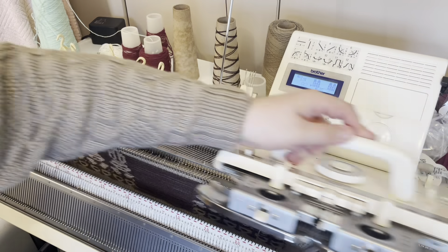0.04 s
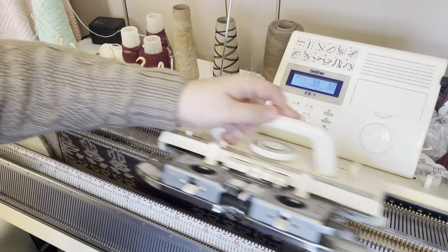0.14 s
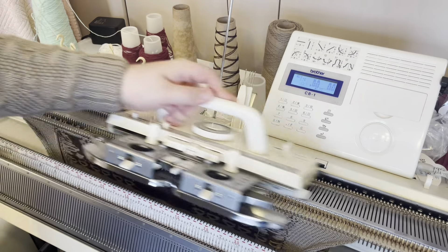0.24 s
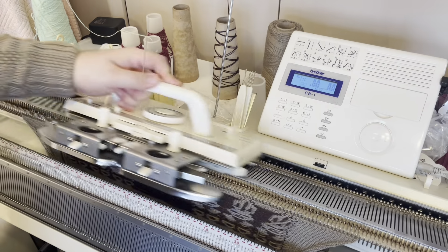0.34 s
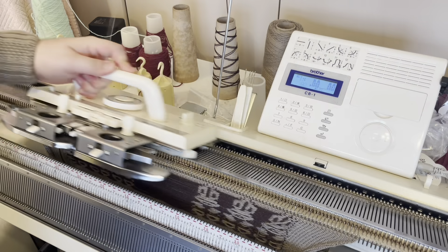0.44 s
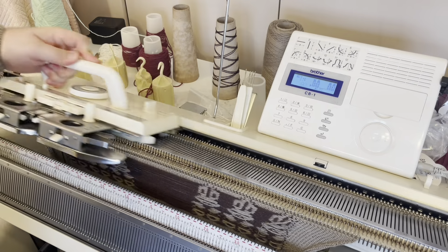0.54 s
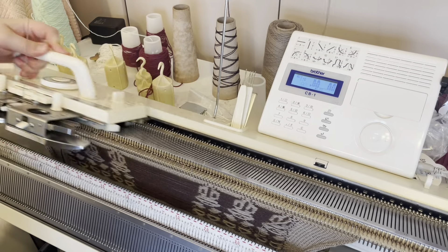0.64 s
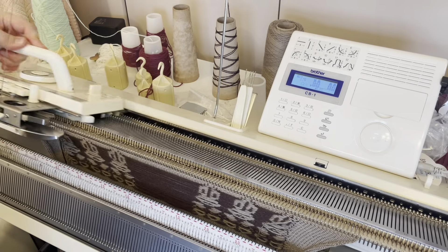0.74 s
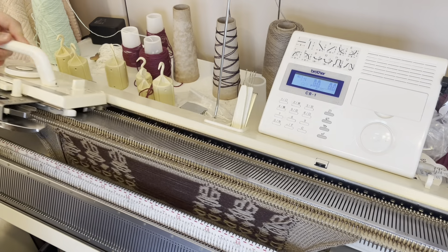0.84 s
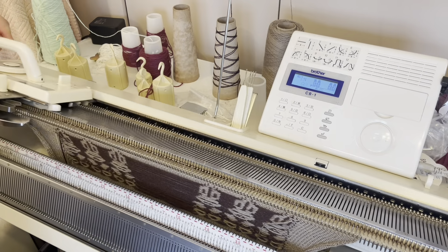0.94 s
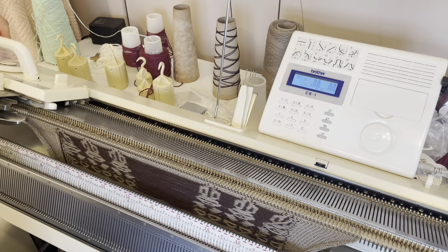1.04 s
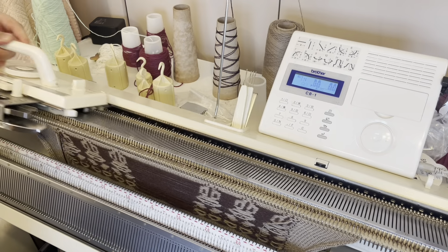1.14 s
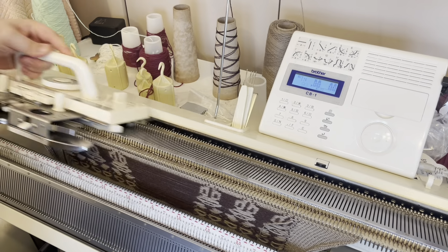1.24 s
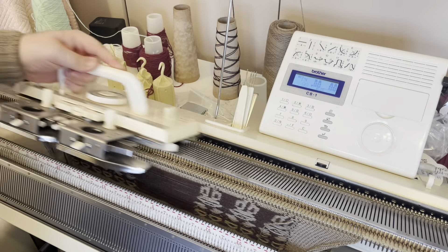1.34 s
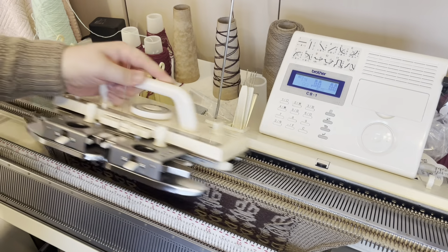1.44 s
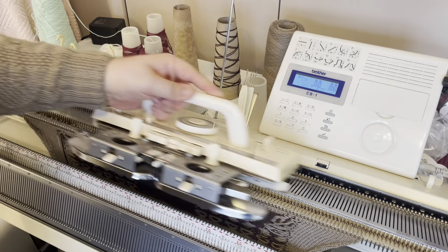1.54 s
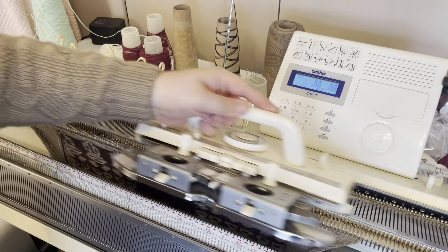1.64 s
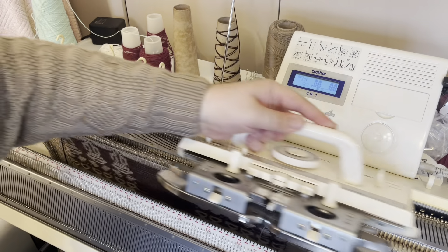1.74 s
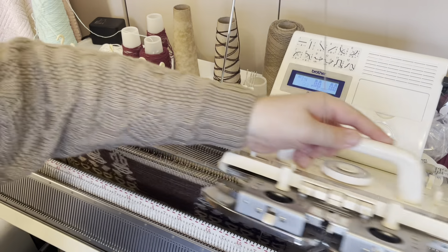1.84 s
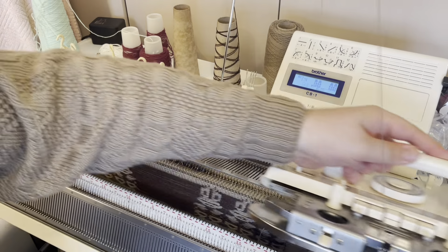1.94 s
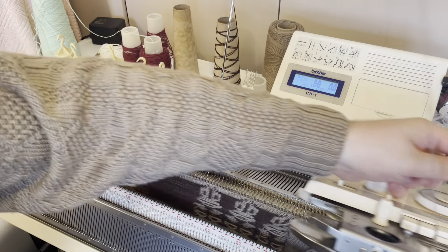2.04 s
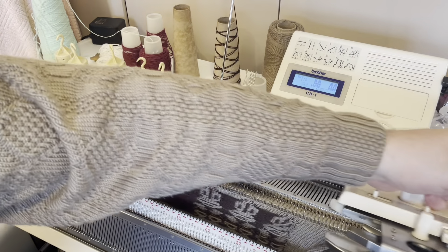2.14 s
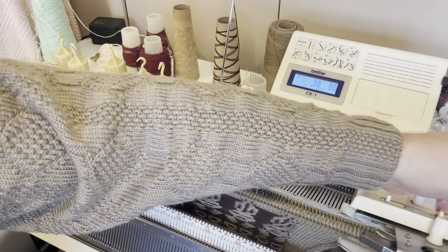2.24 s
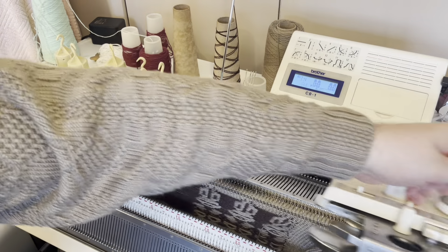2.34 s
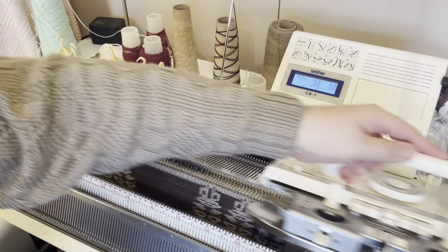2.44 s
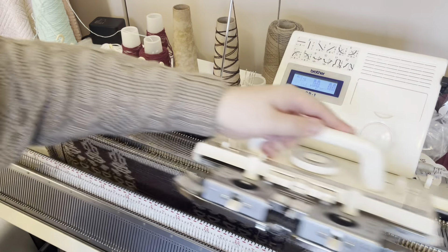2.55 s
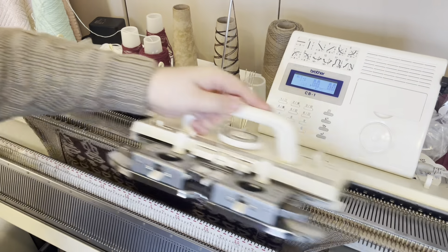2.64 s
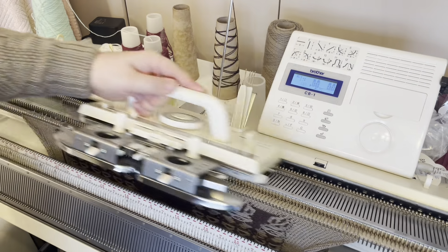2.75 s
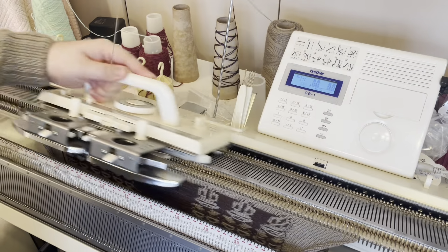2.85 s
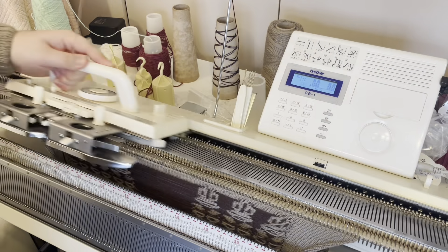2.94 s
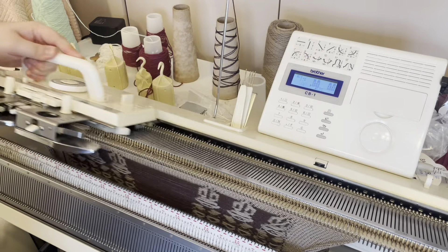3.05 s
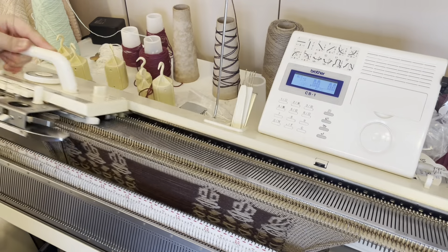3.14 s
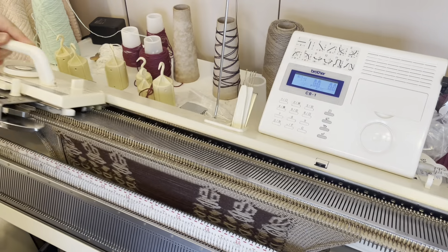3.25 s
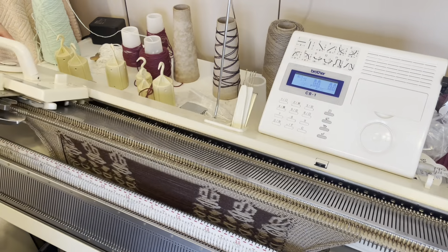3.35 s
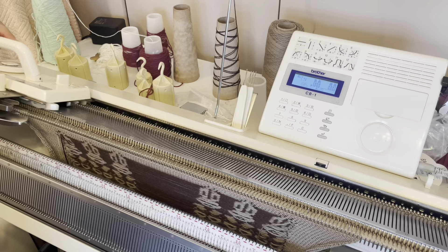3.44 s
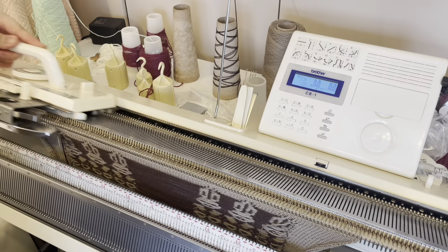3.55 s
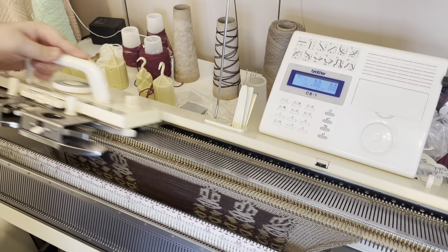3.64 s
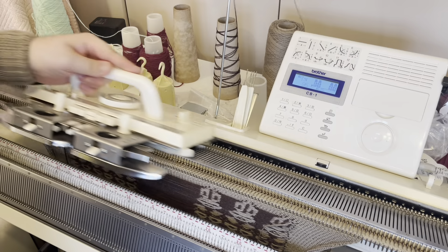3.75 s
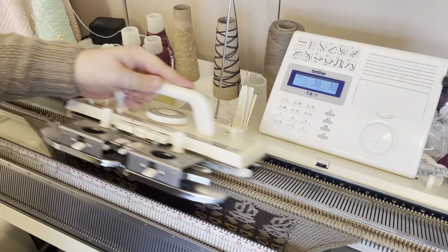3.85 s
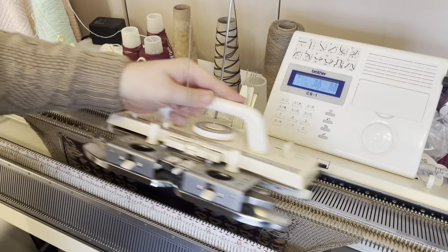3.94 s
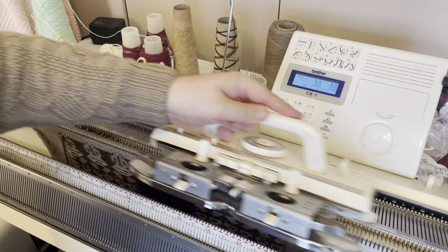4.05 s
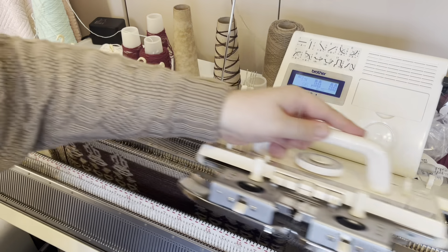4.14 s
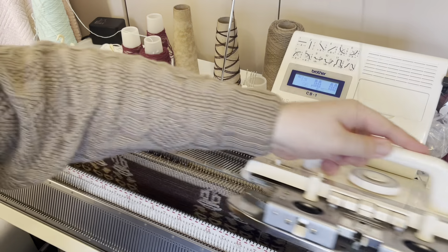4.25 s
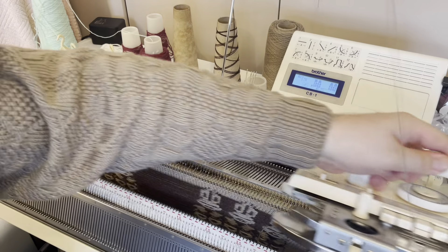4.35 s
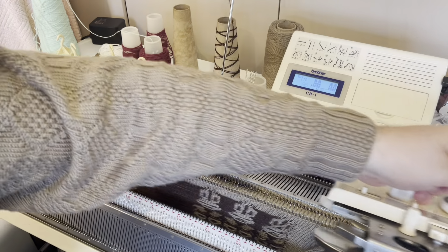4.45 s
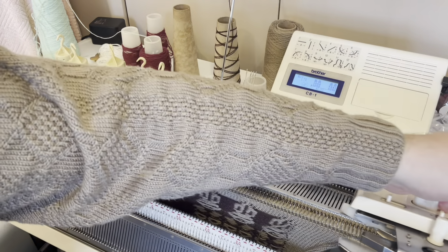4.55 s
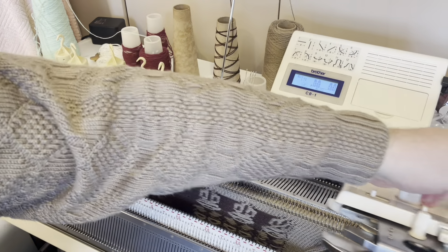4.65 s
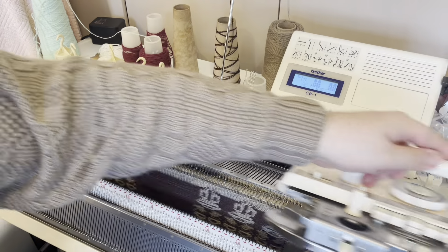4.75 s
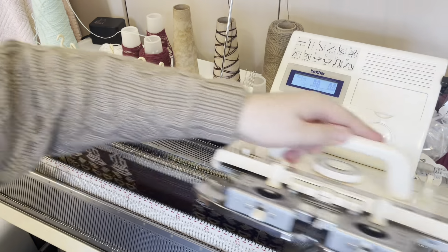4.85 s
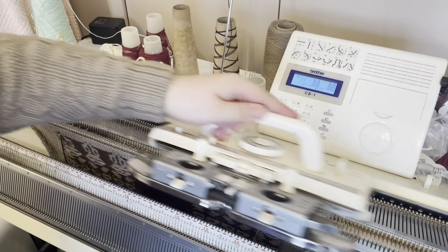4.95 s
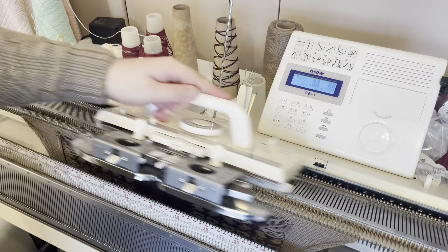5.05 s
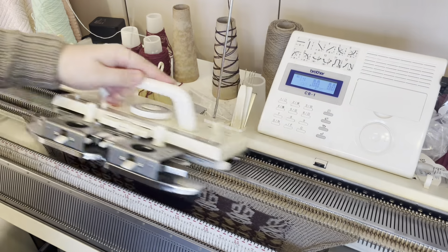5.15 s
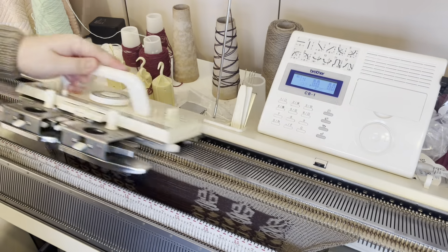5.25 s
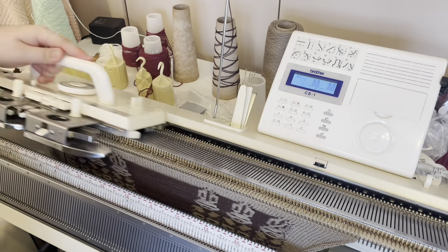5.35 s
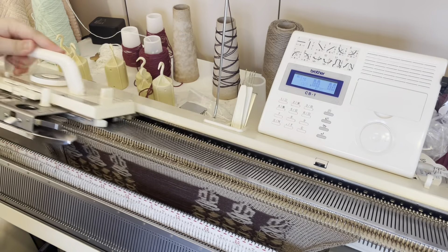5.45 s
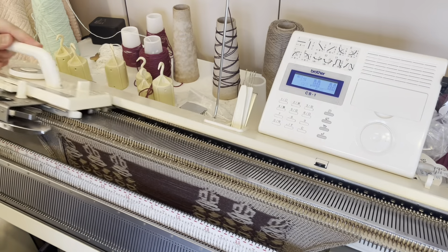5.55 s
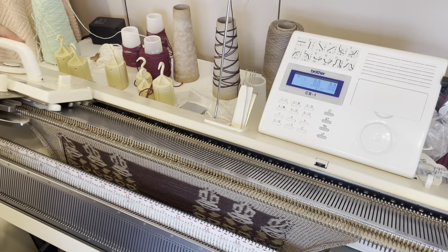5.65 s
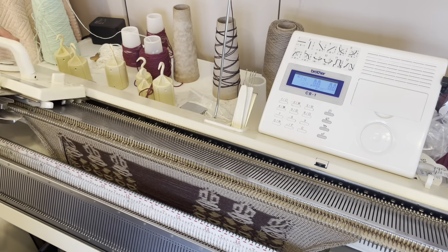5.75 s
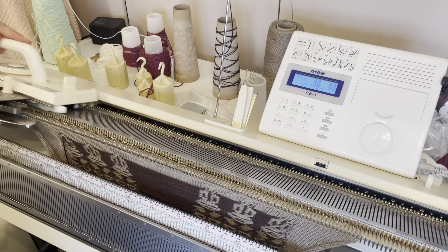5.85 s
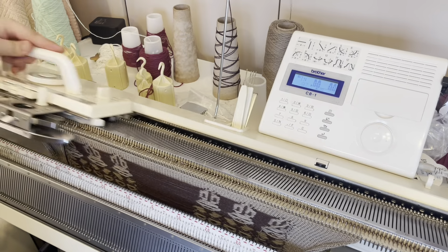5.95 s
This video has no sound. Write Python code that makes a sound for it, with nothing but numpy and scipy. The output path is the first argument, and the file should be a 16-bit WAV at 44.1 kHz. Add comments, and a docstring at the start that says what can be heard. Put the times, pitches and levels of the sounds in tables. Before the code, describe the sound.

A knitting machine carriage runs close to a stereo microphone in a small, soft room. The sound opens already inside a loud pass: a dense bright hiss of latches and sliding steel over a rattling buzz near 200 needle hits per second, with a crack and shudder at once. It slows from about 0.65, falls in pitch and dies near 1.1 amid a click, thin squeaks and light metallic rustling. Further passes surge at about 1.15, 2.35, 3.5 and 4.65, each lasting around a second, attacking quickly, sagging in pitch and ending with a snap and low bumps. Harsh pitched chatter roughens the fastest moments at 2.5-2.7 and, more lightly, 4.8-5.0. The short gaps near 2.2, 3.4, 4.55 and 5.7 hold faint high squeaks, loose needle rustles, quiet room air and a wavering hum. A sixth rush starts around 5.86 and is cut off at full strength.

```python
"""In a small room, the carriage of a knitting machine is pushed to and fro over its steel needle bed.
Periodic impact of cams on needles gives a buzz at the needle rate; latches and sliding steel add a bright rush.
Both are noise and impacts shaped by resonance, with level rising with speed and load.
Stick and slip add modal shudders at the ends of the work, sharp catches at the turns and chatter at top speed.
Faint gliding-free squeaks and rustles fill the pauses, over room air and a wavering hum."""
import sys
import numpy as np
from scipy import signal
from scipy.fft import rfft, irfft, next_fast_len
from scipy.io import wavfile
from scipy.ndimage import uniform_filter1d

SR = 44100
rng = np.random.default_rng(int(sys.argv[2]) if len(sys.argv) > 2 else 0)


def generate_wav(sig):
    """Save sig (samples, or channels by samples) to the path in sys.argv[1] as 16-bit PCM at SR."""
    pcm = np.round(np.clip(np.atleast_2d(sig).T, -1, 1) * 32767).astype(np.int16)
    wavfile.write(sys.argv[1], SR, pcm)


N = 265041

# Passes, leftward and rightward in turn: start t/s, run-in until all cams bite t/s, run-out t/s,
# creep before the start rate/(needles/s), early level/dB, middle level/dB, late level/dB
STROKES = [ (-0.2, 0.17, 0.49, 58, 3.6, 1.1, 1.95), (1.124, 0.17, 0.43, 34, 0.48, 1.05, 0.5),
           (2.331, 0.21, 0.44, 26, 0.17, -2, -1.57), (3.502, 0.15, 0.43, 50, 0.4, 0.44, 0.12),
           (4.645, 0.24, .42, 27.18, 0.39, 0.6, 1.1), (5.862, 0.16, .4, 40.38, 0.1, 0, 0), ]
# Speed of the hand through the knitting, one curve per pass: t/s, rate/(needles/s)
HAND_SPEEDS = [
    [(0.0, 180), (0.04, 198), (0.16, 209), (0.25, 209), (0.38, 180), (0.56, 154), (0.66, 143)],
    [(1.245, 213), (1.29, 229), (1.40, 197), (1.48, 182), (1.6, 184), (1.70, 169), (1.79, 153), (1.9, 142),
     (1.96, 130)],
    [(2.45, 200), (2.5, 230), (2.56, 234), (2.66, 246), (2.712, 217), (2.82, 182), (2.942, 169),
     (3.02, 145), (3.14, 143)],
    [(3.61, 208), (3.66, 230), (3.73, 223), (3.86, 189), (3.95, 182), (4.02, 171), (4.08, 180), (4.19, 162),
     (4.31, 130)],
    [(4.78, 189), (4.84, 228), (4.92, 239), (5.0, 225), (5.07, 207), (5.166, 194), (5.25, 175), (5.33, 155),
     (5.45, 138)],
    [(5.98, 202), (6.03, 210)],
]
# Spectrum of latches and sliding metal: f/Hz, relative density level/dB
RUSH_SPECTRUM = [(1200, -35), (2400, -17), (3300, -17), (4200, -15.5), (6300, -14), (7900, -9), (9000, -5),
                 (10000, -4.5), (11200, 0), (12100, -9), (13000, -18), (14200, -26.5), (16000, -35)]
# Spectrum of the needle butts on the cams: f/Hz, relative density level/dB
RATTLE_SPECTRUM = [(30, -59.5), (55, -24), (85, -5), (135, -11.5), (200, 2.5), (260, -9.5), (350, -6.5),
                   (480, -1.5), (1100, -8.5), (1450, -8), (2200, -8.5), (3500, -10.5), (8000, -24)]
# Resonances of the needle bed: f/Hz, width f/Hz, lift level/dB
BED_RESONANCES = [(257, 190, -4.5), (430, 37, 3.5), (585, 220, -0.5), (690, 84, -1), (1100, 320, 5),
                  (1663, 41, 5.5), (3240, 99, 4.5), (5100, 140, 3)]
# Narrow resonances of the cam plate: f/Hz, width f/Hz, lift going left level/dB, lift going right level/dB
PLATE_RESONANCES = [(304, 60, -0.5, 7), (436, 41, 10, 8), (542, 42, 5, 9), (631, 76, 7.5, 5),
                    (907, 150, -3, 3.5), (1046, 74, 3.5, 8), (1686, 95, 2.5, 0.5)]
# Overtones of the needle row: multiple of the needle rate, relative level/dB
OVERTONES = [(2, -20), (3, -17), (4, -18.5), (5, -14.5), (6, -18), (7, -18), (8, -17), (9, -19.5),
             (10, -16.5)]
# Nearby reflecting surfaces: delay at mid bed t/s, change from end to end t/s, relative level/dB
REFLECTORS = [(.0014, .0009, -16.5), (.0031, -.0017, -14.5)]
# Scattered sound against direct sound: f/Hz, relative level/dB
SCATTER_SPECTRUM = [(60, -35), (170, -18.5), (300, -9.5), (500, -7), (1200, -5.5), (3000, -4.5), (6500, -5),
                    (8300, -6.5), (12000, -38)]
# Left minus right: f/Hz, level/dB
SIDE_BALANCE = [(100, 1), (600, 0.7), (2000, 1.5), (4500, 3), (8000, 1.7), (12000, -0.5)]
# Spectrum of the quiet room air: f/Hz, relative density level/dB
AIR_SPECTRUM = [(25, -43), (55, -9), (100, 4), (220, 5), (330, 3), (600, -0.5), (1200, -11), (3000, -29),
                (12000, -42)]
# Sharp catches of the carriage: t/s, relative crack level/dB, relative clack level/dB, lowest crack f/Hz
CATCHES = [(0.024, -2, -23, 2980), (0.813, -17, -44, 4260), (1.065, -47, -59, 990), (1.177, -15, -42, 2999),
           (2.0798, -18, -36, 2540), (2.124, -32, -53, 3004), (2.337, -29, -51, 3000),
           (2.3715, -12, -31.5, 1000), (3.3026, -17, -62, 6470), (3.4848, -23, -58, 6267),
           (3.547, -16, -45, 3006), (4.4189, -17, -40, 2468), (4.49, -30, -58, 3003),
           (4.7032, -13.5, -38, 1000), (5.834, -25, -66, 5970), (5.916, -17, -41, 3002)]
# Spectrum of the bright crack: f/Hz, relative density level/dB
CRACK_SPECTRUM = [(200, 5), (1500, -28), (4000, 3.5), (7000, 7), (12000, 10.5), (13500, -26), (16000, -31)]
# Spectrum of the dull housing clack: f/Hz, relative density level/dB
CLACK_SPECTRUM = [(150, -17), (500, -11), (1400, 4), (3000, 1.5), (8000, -8)]
# Shudders of the carriage on its rail: t/s, relative level/dB, length t/s, weight of the low modes level/dB
SHUDDERS = [(0.07, -18, 0.028, -6.5), (0.765, -28.5, 0.04, -6), (1.008, -46.5, 0.023, 5),
            (1.065, -43, 0.0119, -4), (1.312, -28.5, 0.022, 6), (2.013, -28, 0.036, -6),
            (2.087, -29.5, 0.03, -7), (2.27, -39.5, 0.011, -3), (2.383, -36, .025, 6),
            (2.547, -22, .02, -6), (3.19, -25.5, 0.04, -7), (3.432, -41.5, 0.014, 0), (3.691, -30, .035, 5),
            (4.42, -31, 0.02, -4.5), (4.606, -42, .015, -4), (4.71, -37, 0.022, 5), (4.874, -27, 0.037, -1),
            (5.515, -28, 0.048, -4), (5.772, -41, 0.0097, -4)]
# Modes of the frame: f/Hz, relative level/dB, 60 dB decay t/s
FRAME_RESONANCES = [(95.7, -11.5, 0.35), (132, -4, 0.042), (178, 2.5, 0.13), (240, -2, 0.056),
                    (292, -2, 0.063), (443, -1, 0.031), (516, -3, 0.057), (715, -0.5, 0.024),
                    (996, -2, 0.019)]
# Squeaks of steel on steel: middle t/s, half length t/s, level/dB, f/Hz
SQUEAK_NOTES = [(0.87, .04, -62, 4380), (0.95, .025, -59, 4380), (1.026, .05, -71, 4380),
                (2.17, 0.068, -63, 4400), (2.355, .015, -53, 11900), (3.287, .025, -49, 4380),
                (3.401, .08, -62, 4400), (4.55, .08, -65, 4420), (5.68, .07, -61, 11740),
                (5.62, 0.046, -62, 4350), (5.738, 0.05, -65, 4380)]
# Rustles of loose needles and latches: middle t/s, half length t/s, level/dB
RUSTLE_SWELLS = [(0.894, 0.063, -58), (1.125, 0.035, -57), (2.166, 0.059, -66), (2.302, .018, -63),
                 (3.465, .015, -60), (4.477, .025, -58), (4.66, .025, -64), (5.657, 0.028, -59)]
# Hard chatter at top speed: start t/s, length t/s, level/dB
CHATTER_SPANS = [(2.481, 0.2, -31.5), (4.815, 0.16, -34.5)]
# Resonances that the chatter excites: f/Hz, width f/Hz, relative level/dB
CHATTER_RESONANCES = [(480, 100, -7), (730, 100, -13), (956, 90, 2), (1660, 76, 4.5), (3230, 710, -7)]

TIME = np.arange(N) / SR
SIZE = next_fast_len(N + SR // 2, True)
HZ = np.arange(SIZE // 2 + 1) * SR / SIZE
# The hand takes up the play before a pass; share of the load at the start of the pass
TAKE_UP_S, FIRST_BITE = 0.095, 0.42
# Needles per s: at ordinary speed, at the turns, least chatter of loose needles
USUAL_RATE, REST_RATE, JIGGLE_RATE = 197.8, 10.5, 90
# Level at the usual rate, and growth per doubling of speed; the rattle is louder toward the right end
RUSH_DB, RUSH_DB_PER_DOUBLING = -20.5, 11.5
RATTLE_DB, RATTLE_DB_PER_DOUBLING, RIGHT_END_DB = -34.5, 8, 2
# The drone booms when the needle rate crosses this resonance
DRONE_HZ, DRONE_WIDTH_HZ, DRONE_DB = 176, 29, -39.5
# Bend of the run-out; the rush drops as the latches leave the yarn
BRAKE_CURVE, EXIT_S, EXIT_DB = 2.2, 0.18, -3
# The rattle is light at the start and comes back to full strength as the cams bite
UNLOADED_DB, ENTRY_DB, ENTRY_S = -3.5, 0, 0.28
BOOM_BELOW_HZ, CUTOFF_HZ = 380, 15900   # limit of the low frame modes; top of the audible band kept


def from_db(db):
    """Amplitude ratio from level: 20 dB per factor of ten."""
    return 10 ** (np.asarray(db) / 20)


def rms_one(x):
    """Normalisation to unit root-mean-square amplitude."""
    return x / np.sqrt(np.mean(x ** 2) + 1e-20)


def in_time(rows):
    """Linear interpolation of each column of a curve at every sample."""
    s, *columns = np.transpose(rows)
    return [np.interp(TIME, s, c) for c in columns]


def over_hz(points):
    """Interpolation of a spectrum on a log-frequency axis."""
    hz, value = np.transpose(points)
    return np.interp(np.log(HZ + 1), np.log(hz), value)


def colour(x, curve_db):
    """Minimum-phase filtering: the folded cepstrum makes the gain curve causal."""
    cepstrum = irfft(np.log(from_db(curve_db)), SIZE)
    cepstrum[1:SIZE // 2] *= 2
    cepstrum[SIZE // 2 + 1:] = 0
    response = np.exp(rfft(cepstrum))
    return irfft(rfft(x, SIZE) * response, SIZE)[..., :N]


def drift(rate):
    """Low-pass random modulation of spread 1, changing about `rate` times a second."""
    step, size = 40, 8192   # samples per slow point, number of slow points
    hz = np.arange(size // 2 + 1) * SR / step / size
    slow = irfft(rfft(rng.standard_normal(size)) / (1 + (hz / rate) ** 2))
    return np.interp(np.arange(N) / step, np.arange(size), rms_one(slow))


def level_out(x):
    """Division by the short-term rms: the slow level is evened out and the grain kept."""
    return x / np.sqrt(np.abs(uniform_filter1d(x ** 2, SR // 20)) + 1e-12)


def lift_db(hz, resonances):
    """Superposed resonance curves: the lift in dB at a frequency."""
    return sum(lift / (1 + (2 * (hz - centre) / width) ** 2) for centre, width, lift in resonances)


def spread(direct, scattered):
    """Mid-side superposition: scattered sound reaches left and right with opposite sign."""
    return direct + colour(scattered, over_hz(SCATTER_SPECTRUM)) * np.array([[1], [-1]])


def swell(middle_s, half_s, db):
    """Hyperbolic-secant envelope: a smooth rise and fall with long skirts."""
    return from_db(db) / np.cosh(np.clip((TIME - middle_s) / half_s * np.sqrt(2), -20, 20))


def stroke(start, glide, run_out_s):
    """Kinematics of one pass: a quick shove, the glide through the knitting, then the run-out."""
    shove = np.sin(np.pi / 2 * np.interp(TIME, [start, glide[0][0]], [0, 1]))
    run_out = np.clip(1 - (TIME - glide[-1][0]) / run_out_s, 0, 1) ** BRAKE_CURVE
    return shove * in_time(glide)[0] * run_out


def motion():
    """Level follows speed and load: needle rate, position, and levels of rush, rattle and drone."""
    rate, effort = np.zeros(N), np.full(N, float(REST_RATE))
    course, flares = [], []
    for k, (glide, row) in enumerate(zip(HAND_SPEEDS, STROKES)):
        start, run_in_s, run_out_s, creep, early_db, middle_db, late_db = row
        speed = stroke(start, glide, run_out_s)
        side = (-1) ** k / 2   # +1/2 is the right end
        bite, brake = start + run_in_s, glide[-1][0]
        load = np.interp(TIME, [start, bite], [FIRST_BITE, 1])
        take_up = np.interp(TIME, [start - TAKE_UP_S, start, bite], [0, creep, 0])
        rate = np.maximum(rate, speed)
        effort = np.maximum(effort, np.maximum(speed * load, take_up))
        course += [
            (bite, early_db, side, 0),
            ((bite + brake) / 2, middle_db, 0, 0),
            (brake, late_db, -side, 0),
            (brake + EXIT_S, late_db, -side, EXIT_DB),
        ]
        flares += [
            (start - TAKE_UP_S, 0),
            (start + run_in_s / 2, UNLOADED_DB),
            (bite, ENTRY_DB),
            (bite + ENTRY_S, 0),
        ]
    force_db, position, exit_db = in_time(course)
    flare_db, = in_time(flares)
    rate = np.maximum(rate, JIGGLE_RATE)
    doublings = np.log2(effort / USUAL_RATE)
    rush_db = RUSH_DB + RUSH_DB_PER_DOUBLING * doublings + force_db + exit_db
    rattle_db = RATTLE_DB + RATTLE_DB_PER_DOUBLING * doublings + force_db
    rattle_db = rattle_db + RIGHT_END_DB * position + flare_db
    off_resonance_db = 20 * np.log10(1 + (2 * (rate - DRONE_HZ) / DRONE_WIDTH_HZ) ** 2)
    drone_db = DRONE_DB + RUSH_DB_PER_DOUBLING * doublings - off_resonance_db
    return rate, position, rush_db, rattle_db, drone_db


def needle_hits(travel, jitter_s, spread_db, count):
    """Impulse train: each needle meets `count` cam edges, with jitter in time and spread in force."""
    out, needles = np.zeros(N), np.arange(2000)
    for edge in range(count):
        late, force = rng.standard_normal((2, len(needles)))
        s = np.interp(needles + rng.random(), travel, TIME, right=-1) + jitter_s * late
        heard = (s > 0) & (s < TIME[-1])
        strength = from_db(spread_db * np.clip(force[heard], -2, 2))
        np.add.at(out, (s[heard] * SR).astype(int), (-1) ** edge * strength)
    return out


def pings(travel):
    """Free vibration: each needle that the cams flick rings briefly at a pitch of its own."""
    t60, spread_db, low_hz, high_hz = .02, 2, 1500, 11000
    out, t = np.zeros(N + SR), TIME[:SR // 30]
    starts = np.searchsorted(travel, np.arange(travel[-1]))
    pitch, strength = rng.random((2000, 2))[:len(starts)].T
    hz = low_hz + (high_hz - low_hz) * pitch
    force = from_db(spread_db * (2 * strength - 1))
    rings = force[:, None] * from_db(-60 * t / t60) * np.sin(2 * np.pi * hz[:, None] * t)
    for start, ring in zip(starts, rings):
        out[start:start + len(t)] += ring
    return rms_one(out[:N])


def rush(travel, rush_db):
    """Impact and friction noise: latches flick, needles ring and steel hisses in its slots."""
    latches = level_out(needle_hits(travel, jitter_s=.0006, spread_db=2.0, count=9))
    ringing = from_db(-11.5) * pings(travel)
    sliding, scattered = rng.standard_normal((2, N))
    contact = spread(rms_one(latches + ringing + sliding), scattered)
    sound = rms_one(colour(contact, over_hz(RUSH_SPECTRUM) + lift_db(HZ, BED_RESONANCES)))
    flutter_db, flutter_rate = .6, 28
    return sound * from_db(rush_db + flutter_db * drift(flutter_rate))


def rattle(travel, rattle_db, rub_db=-2, flutter_db=1.5):
    """Forced vibration: needle butts knock against the cams and shake the bed."""
    knocks = level_out(needle_hits(travel, jitter_s=.0005, spread_db=0.6, count=5))
    rubbing, scattered = rng.standard_normal((2, N))
    contact = spread(rms_one(knocks + from_db(rub_db) * rubbing), scattered)
    sound = rms_one(colour(contact, over_hz(RATTLE_SPECTRUM) + lift_db(HZ, BED_RESONANCES)))
    return sound * from_db(rattle_db + flutter_db * drift(27))


def buzz(travel, rate, drone_db, rattle_db, over_rattle_db=1):
    """Periodic excitation: evenly spaced needles give a drone and gliding overtones that swell and break up."""
    turn = 2 * np.pi * travel
    swell_db, swell_rate, waver = 2, 14, .25   # waver in radians
    breakup, breakup_rate = .75, 15
    drone_level = from_db(drone_db + swell_db * drift(swell_rate))
    drone = drone_level * np.sin(turn + waver * drift(25))
    engaged = np.clip(rate / 140, 0, 1) ** 4
    direct, scattered = np.zeros((2, N))
    going_right = np.searchsorted([row[0] for row in STROKES], TIME) % 2 == 0
    plate = [(hz, width, np.where(going_right, right_db, left_db))
             for hz, width, left_db, right_db in PLATE_RESONANCES]
    for multiple, db in OVERTONES:
        # an overtone swells as it glides through a resonance of the plate
        level = engaged * from_db(rattle_db + over_rattle_db + db + lift_db(multiple * rate, plate))
        unevenness = 1 + breakup * (drift(breakup_rate) + 1j * drift(breakup_rate))
        unevenness = unevenness / np.sqrt(1 + 2 * breakup ** 2)
        partial = level * unevenness * np.exp(1j * round(multiple) * turn)
        direct += partial.imag
        # the paths shift as the carriage moves
        path_phase = travel / 20 + rng.uniform(0, 2 * np.pi)
        scattered += (partial * np.exp(1j * path_phase)).imag
    return np.sqrt(2) * spread(drone + direct, scattered)   # a sine of unit rms has peak sqrt(2)


def shifting_echoes(x, position):
    """Comb-filter interference: echoes move with the carriage, so peaks and gaps wander in frequency."""
    out, power = x, 1
    for delay_s, change_s, db in REFLECTORS:
        then = np.arange(N) - np.round((delay_s + change_s * position) * SR).astype(int)
        out = out + from_db(db) * x[:, np.clip(then, 0, N - 1)]
        power = power + from_db(db) ** 2
    return out / np.sqrt(power)


def room(x, wet_db, t60=0.022):
    """Exponential reverberation: a short tail in a room full of yarn, different on each side."""
    t = TIME[:SR // 2]
    tails = rng.standard_normal((2, len(t))) * from_db(-60 * t / t60) * (t > .002)
    tails *= from_db(wet_db) / np.sqrt(np.sum(tails ** 2, axis=1, keepdims=True))
    return x + signal.fftconvolve(np.atleast_2d(x), tails, axes=1)[:, :N]


def background(noise_db=-61, hum_hz=97, hum_db=-72):
    """Stationary noise and a modulated tone: quiet room air and a low hum that comes and goes."""
    noise = spread(*rng.standard_normal((2, N)))
    air = from_db(noise_db) * rms_one(colour(noise, over_hz(AIR_SPECTRUM)))
    wander = drift(7) + 1j * drift(7)
    return air + from_db(hum_db) * (wander * np.exp(2j * np.pi * hum_hz * TIME)).real


def catches(decay_s=0.0023, dull_decay_s=0.0052, bright_db=-12.5, dull_db=1):
    """Damped impact noise: levers snap over with a bright crack, thinner for small parts, and a housing clack."""
    white = rng.standard_normal((2, N))
    bright = rms_one(colour(white[0], over_hz(CRACK_SPECTRUM)))
    dull = rms_one(colour(white[1], over_hz(CLACK_SPECTRUM)))
    out = np.zeros(N)
    for s, crack_db, clack_db, lowest_hz in CATCHES:
        span = slice(int(s * SR), int(s * SR) + SR // 20)
        age = TIME[:len(out[span])]
        crack = bright[span] * from_db(crack_db + bright_db) * np.exp(-age / decay_s)
        high_pass = signal.butter(6, lowest_hz, "high", fs=SR, output="sos")
        out[span] += signal.sosfilt(high_pass, crack)
        out[span] += dull[span] * from_db(clack_db + dull_db) * np.exp(-age / dull_decay_s)
    return out


def shudders(gain_db=-2, fade_db=5, uneven_db=3, low_hz=70, contact_hz=1400, count=6):
    """Modal excitation: a loose run of uneven, weakening bumps sets the frame ringing."""
    out, t = np.zeros(N + SR), TIME[:SR // 4]
    for s, level_db, length_s, boom_db in SHUDDERS:
        ring = np.zeros(len(t))
        for share in (np.arange(count) + rng.random(count)) / count:
            age = np.maximum(t - length_s * share, 0)
            for hz, db, t60 in FRAME_RESONANCES:
                mean_db = db + boom_db * (hz < BOOM_BELOW_HZ) - fade_db * share
                force = rng.choice([-1, 1]) * from_db(rng.normal(mean_db, uneven_db))
                ring += force * from_db(-60 * age / t60) * np.sin(2 * np.pi * hz * age)
        start = int(s * SR)
        out[start:start + len(t)] += from_db(level_db + gain_db) * ring / np.abs(ring).max()
    band = signal.butter(2, [low_hz, contact_hz], "band", fs=SR, output="sos")
    return signal.sosfilt(band, out[:N])


def squeaks(waver_hz=24, flicker_db=2):
    """Frictional tone: steel on steel gives one thin, slightly unsteady note that swells and fades."""
    waver = np.cumsum(waver_hz * drift(114)) / SR
    notes = sum(swell(s, half_s, db) * np.sin(2 * np.pi * (hz * TIME + waver))
                for s, half_s, db, hz in SQUEAK_NOTES)
    return notes * from_db(flicker_db * drift(30))


def rustles(touches_per_s=1800, low_hz=3800, high_hz=7600, width_hz=160, count=12):
    """Random impulses on resonators: loose steel parts touch and ring briefly at one of their pitches."""
    chance, force, part = rng.random(N), rng.uniform(-1.1, 1, N), rng.integers(0, count, N)
    touches = force * (chance < touches_per_s / SR)
    rings = np.zeros(N)
    for k, hz in enumerate(np.geomspace(low_hz, high_hz, count)):
        resonator = signal.iirpeak(hz, hz / width_hz, fs=SR)
        rings += signal.lfilter(*resonator, touches * (part == k) + 1e-18)
    return level_out(rings) * sum(swell(*row) for row in RUSTLE_SWELLS)


def chatter(travel, edge_s=.035, spread_db=3):
    """Periodic impact on resonators: one hard knock per needle rings the carriage in a harsh, pitched surge."""
    knocks = needle_hits(travel, jitter_s=.00007, spread_db=spread_db, count=1)
    sound = np.zeros(N)
    for hz, width, db in CHATTER_RESONANCES:
        sound += from_db(db) * signal.lfilter(*signal.iirpeak(hz, hz / width, fs=SR), knocks)
    gate = np.zeros(N)
    for s, length, db in CHATTER_SPANS:
        gate += from_db(db) * np.clip(np.minimum(TIME - s, s + length - TIME) / edge_s, 0, 1)
    return gate * level_out(sound)


def scene():
    """Direct-to-reverberant ratio: the carriage runs close by; its catches and rustles stir the room more."""
    rate, position, rush_db, rattle_db, drone_db = motion()
    travel = np.cumsum(rate) / SR   # needles passed
    running = shifting_echoes(rush(travel, rush_db) + rattle(travel, rattle_db), position)
    running = running + buzz(travel, rate, drone_db, rattle_db) + chatter(travel)
    running = room(running, wet_db=-20)
    loose_parts = room(catches() + rustles(), wet_db=-8, t60=0.026)
    return running + loose_parts + squeaks() + shudders() + background()


def record(dry):
    """Path difference between two microphone ports: the left lags in the top treble; the top is cut."""
    in_step_hz, port_lag_s = 8530, .000286
    treble = np.clip((HZ - 7200) / 1000, 0, 1)
    lag = 2 * np.pi * port_lag_s * (HZ - in_step_hz) * treble   # phase in radians
    sides = np.array([[.5], [-.5]])
    response = from_db(sides * over_hz(SIDE_BALANCE)) * np.exp(-1j * sides * lag)
    ports = irfft(rfft(dry, SIZE) * response, SIZE)[:, :N]
    return signal.sosfilt(signal.ellip(10, .2, 80, CUTOFF_HZ, fs=SR, output="sos"), ports)


dry = scene()
out = record(dry)
generate_wav(out)
```